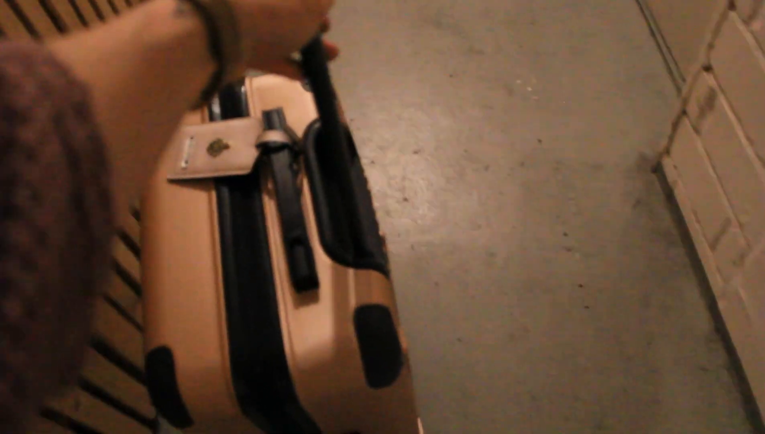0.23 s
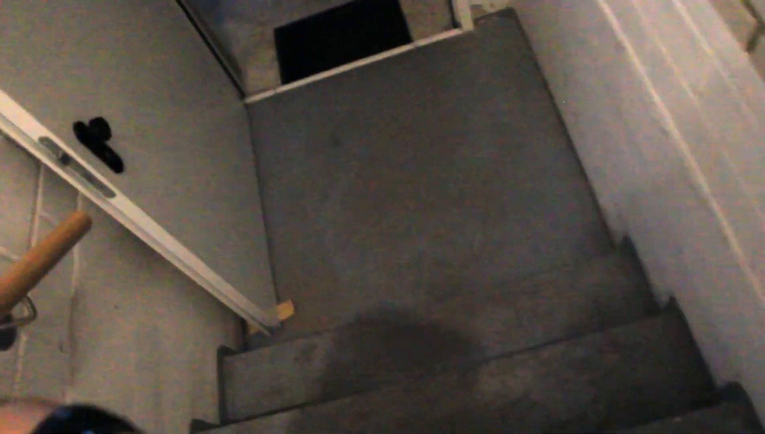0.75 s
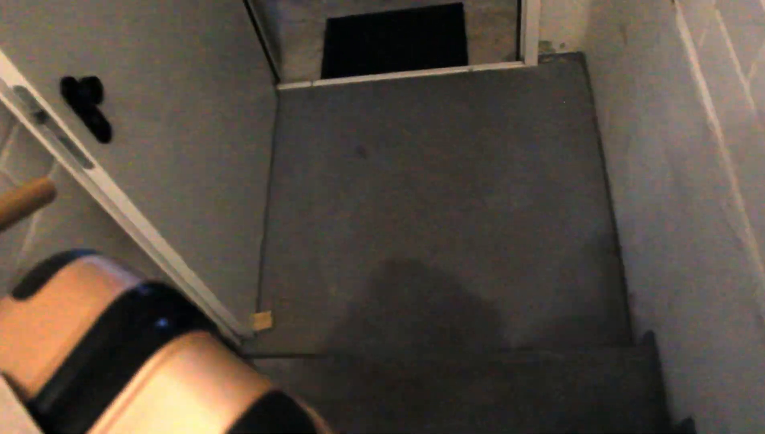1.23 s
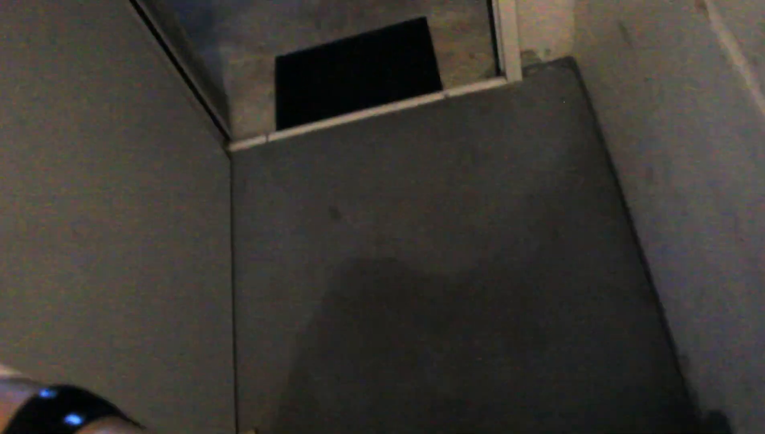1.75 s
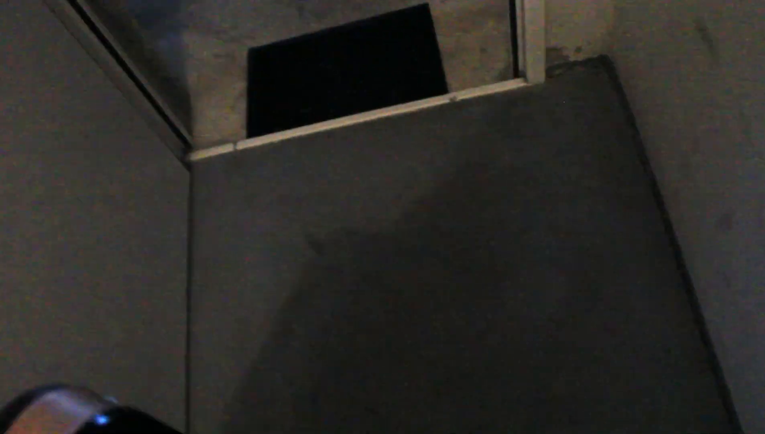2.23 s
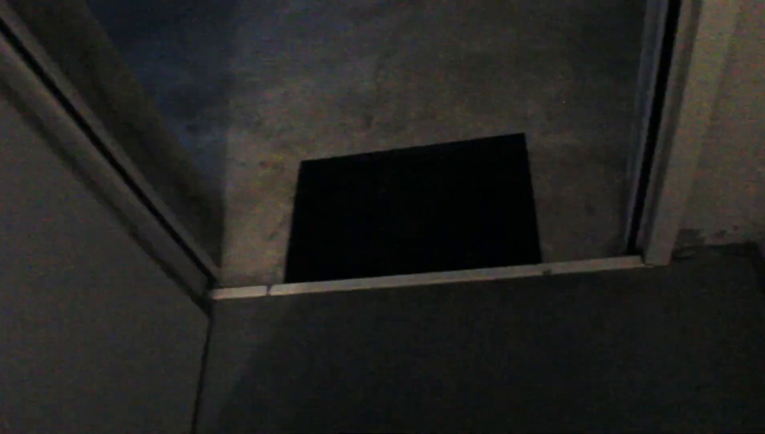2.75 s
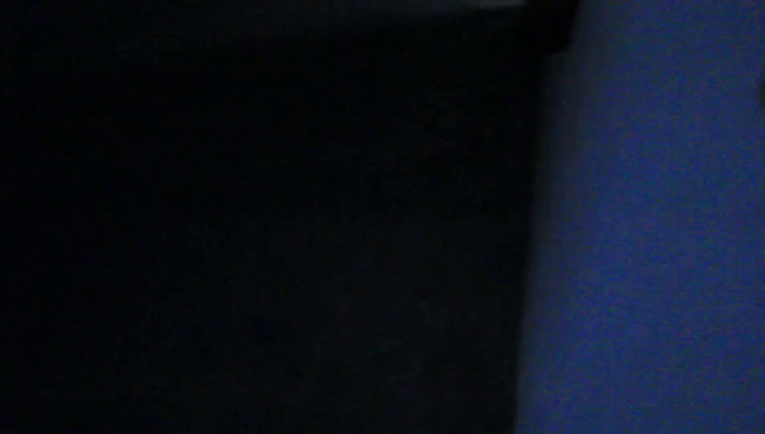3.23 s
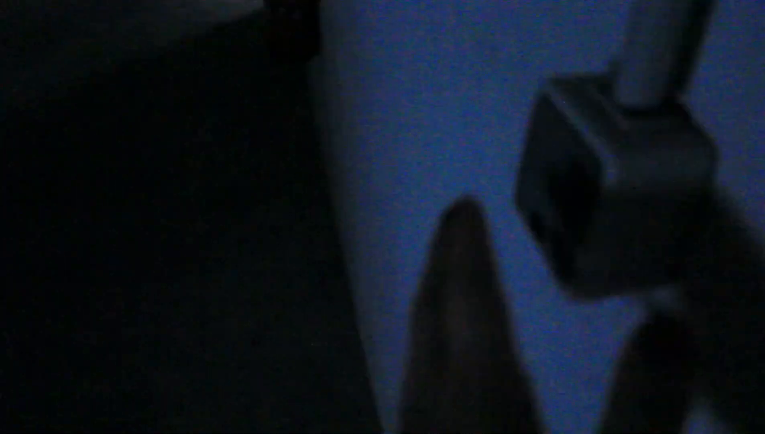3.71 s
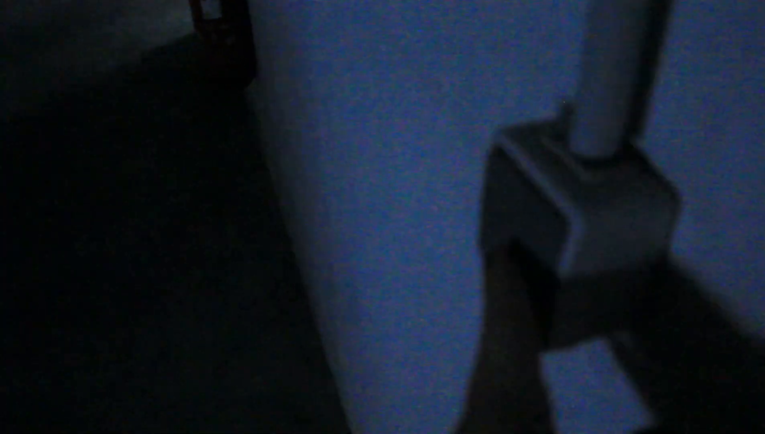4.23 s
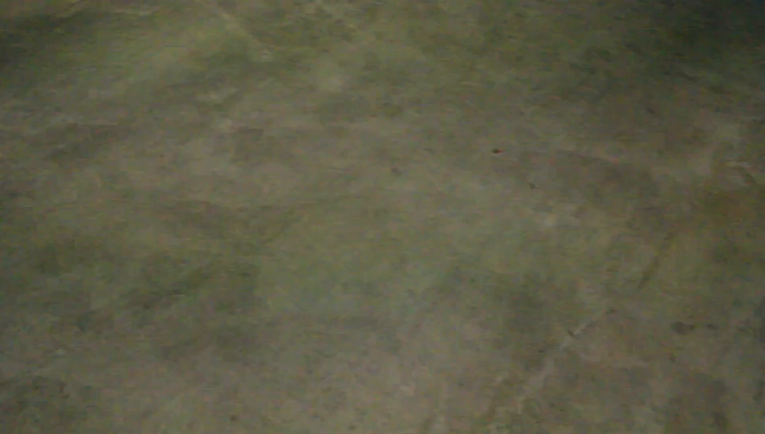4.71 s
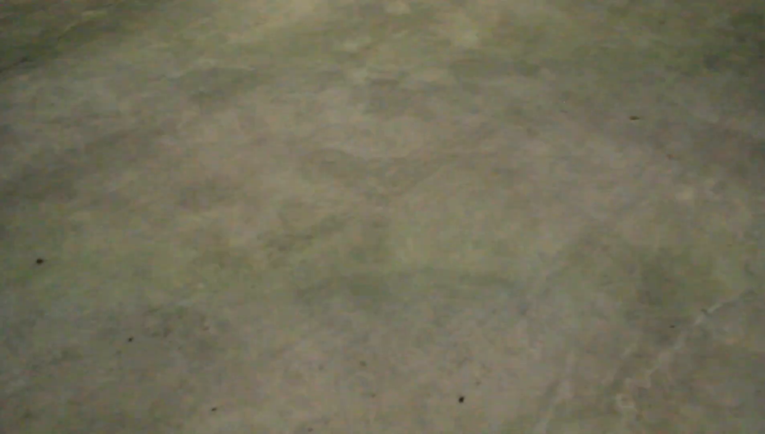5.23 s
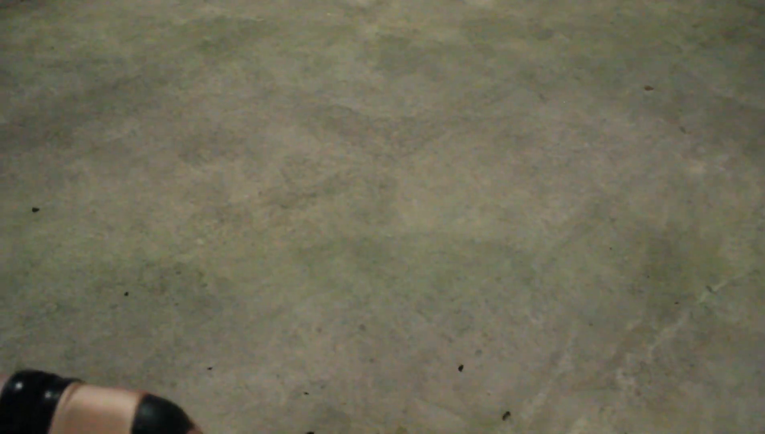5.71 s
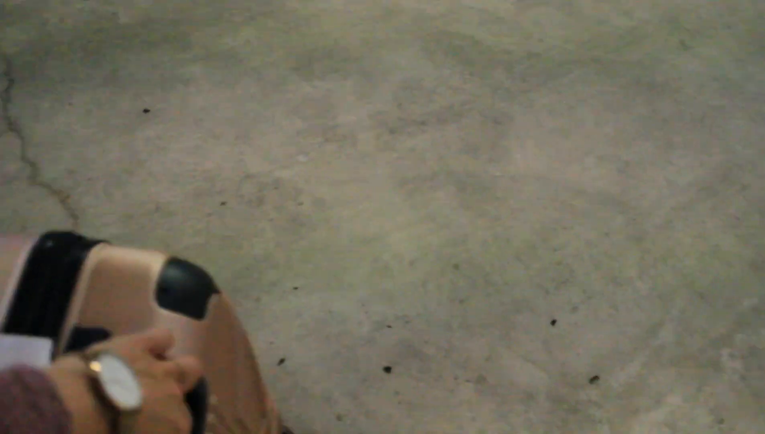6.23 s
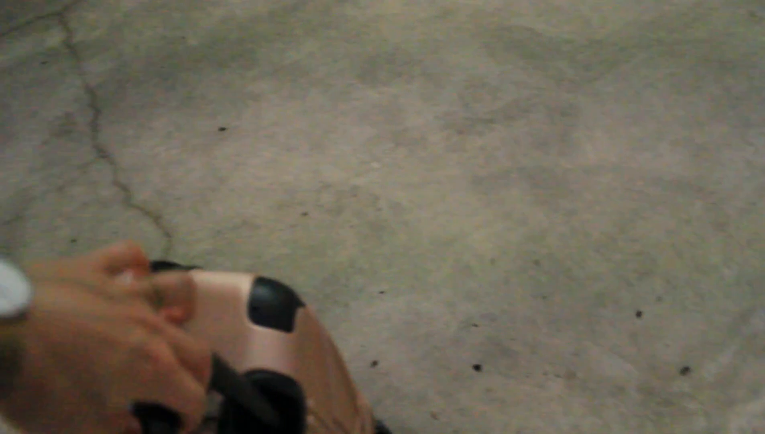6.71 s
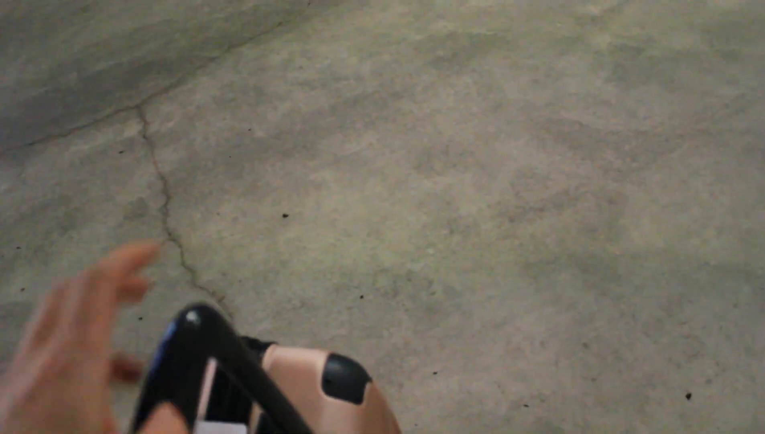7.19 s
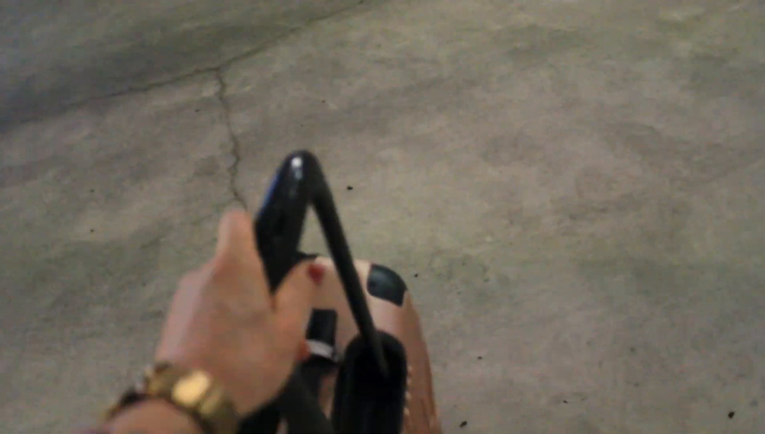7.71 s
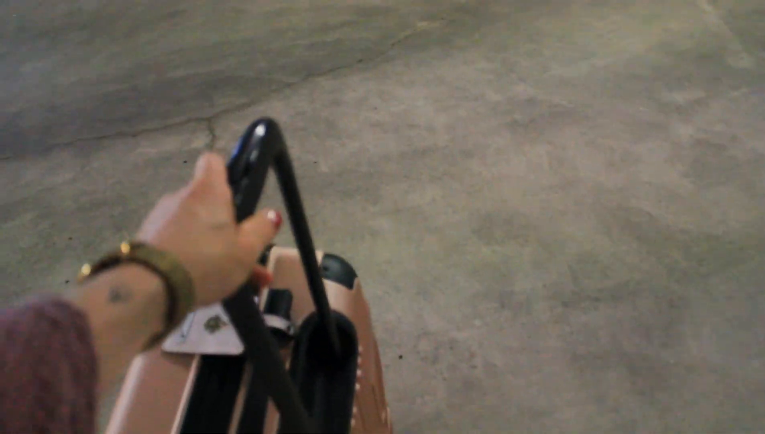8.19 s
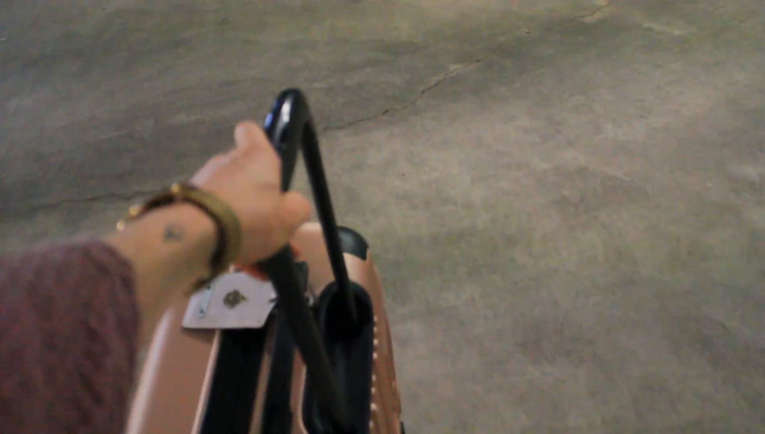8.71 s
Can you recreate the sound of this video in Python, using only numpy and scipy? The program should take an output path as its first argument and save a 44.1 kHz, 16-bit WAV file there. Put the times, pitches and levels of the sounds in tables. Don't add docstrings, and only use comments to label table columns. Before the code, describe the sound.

A hollow plastic suitcase is handled in bare concrete spaces, heard very close. A short gritty roll cuts to stair steps with boomy thuds and metallic shivers, then to a burst of heavy knocks. A plastic switch clacks twice in near quiet. Faint ticks and a shell knock lead to sharp handle latches, a scraping slide, small rattles and renewed soft rolling.

```python
import sys
import numpy as np
from scipy import signal
from scipy.fft import rfft, irfft, next_fast_len
from scipy.io import wavfile

SR = 44100
rng = np.random.default_rng(int(sys.argv[2]) if len(sys.argv) > 2 else 0)


def volts(x):
    e = np.asarray(x, float) / 20
    return 10 ** e


def file_out(sig):
    cols = np.atleast_2d(sig).T
    lim = np.clip(cols, -1, 1)
    pcm = np.round(lim * 32767).astype(np.int16)
    wavfile.write(sys.argv[1], SR, pcm)


N = 394686
STRIKE = 5.3


def unit(x):
    return x / np.sqrt(np.mean(x ** 2) + 1e-20)


def coloured(x, spectrum):
    size = next_fast_len(len(x))
    hz = np.maximum(np.arange(size // 2 + 1) * SR / size, 1)
    point_hz, point_db = np.array(spectrum).T
    gain = volts(np.interp(np.log(hz), np.log(point_hz), point_db))
    return unit(irfft(rfft(x, size) * gain, size)[:len(x)])


def wander(rate_hz):
    knots = rng.standard_normal(900)
    return np.interp(np.arange(N) / SR * rate_hz, np.arange(900), knots)


def grit(per_s, spread_db):
    sizes = volts(spread_db * np.minimum(rng.exponential(1, N), 4)) * rng.choice([-1, 1], N)
    return sizes * (rng.random(N) < per_s / SR) + 1e-18


def ring(x, hz, t60_s):
    r = volts(-60 / (t60_s * SR))
    w = 2 * np.pi * hz / SR
    return signal.lfilter([0, np.sin(w)], [1, -2 * r * np.cos(w), r * r], x)


def band(x, low_hz, high_hz):
    return signal.sosfilt(signal.butter(2, [low_hz, high_hz], "band", fs=SR, output="sos"), x)


def contact(t60_s, length_s):
    t = np.arange(int(length_s * SR)) / SR
    return rng.standard_normal((3, len(t))) * volts(-60 * t / max(t60_s, .002))


def add(out, s, sound, peak_db):
    at = round(s * SR)
    out[at:at + len(sound)] += (sound * volts(peak_db) / np.max(np.abs(sound)))[:N - at]


def gestures(rows, idle_db, rise_db_s, fall_db_s):
    joins_s = (.389, 3.11)
    t = np.arange(0, N, 32) / SR
    power = 0
    for s, db, hold_s in rows:
        rise_db = rise_db_s * np.maximum(s - t, 0)
        fall_db = fall_db_s * np.maximum(t - s - hold_s, 0)
        same_scene = np.searchsorted(joins_s, t) == np.searchsorted(joins_s, s)
        power = power + volts(2 * (db - rise_db - fall_db)) * same_scene
    return 10 * np.log10(np.interp(np.arange(N) / SR, t, power) + volts(2 * idle_db))


def rumble(busy_db):
    # start_s, level_db, hold_s
    rolls = [(0, -33.5, 0.32), (.72, -54, .01), (.85, -40.5, .01), (1.0, -46.5, 0.085), (1.78, -39, .01),
             (2.07, -37.5, 0.27), (2.74, -44, .01), (3.04, -38.5, .07), (3.27, -36, 0.027), (4.95, -52, .1),
             (5.22, -48, 0.22), (5.47, -44, .01), (5.68, -45, .01), (6.24, -42.5, .01),
             (6.53, -32.5, 0.012), (7.1, -40.5, 0.0091), (7.75, -46.5, 0.22), (8.28, -39, 0.27),
             (8.6, -35.5, 0.46)]
    # mode_hz, width_hz, level_db
    shell_modes = [(171.3, 19, 18.5), (244.4, 29, 15), (300, 23, -14), (530, 360, -30.5)]
    # freq_hz, density_db
    rumble_spectrum = [(41, -55), (70, -45), (123, -27), (161, 1), (302, 8.5), (1500, -13), (1950, -70.5),
                       (3300, -120)]
    level_db = gestures(rolls, busy_db - 2.5, rise_db_s=153, fall_db_s=78)
    drive = unit(grit(700, 2.0)) + .5 * rng.standard_normal(N)
    shell = sum(volts(db) * unit(ring(drive, hz, 3.9 / width_hz)) for hz, width_hz, db in shell_modes)
    return volts(level_db + 2.0 * wander(22)) * unit(unit(shell) * 0.28 + coloured(drive, rumble_spectrum))


def thuds():
    # start_s, peak_db, ring_hz, t60_s
    thud_rows = [(0.688, -20, 265, 0.22), (1.299, -21.5, 281, 0.26), (1.734, -24, 185, 0.24),
                 (1.738, -22, 447, 0.12), (2.151, -13, 288, 0.25), (2.69, -12.5, 261, 0.19),
                 (2.692, -20, 540, 0.095), (3.011, -31, 354, 0.1), (3.282, -22, 230, 0.34),
                 (3.814, -32, 338, 0.14), (4.731, -24, 568, 0.22), (5.412, -25, 612, 0.19),
                 (5.623, -31, 540, 0.13), (5.702, -21, 537, 0.15), (6.018, -31, 220, 0.065),
                 (6.127, -22, 206, 0.2), (6.187, -20.5, 205, 0.087), (6.424, -25, 292, 0.15),
                 (6.481, -19, 285, 0.23), (6.547, -34, 307, 0.24), (6.767, -14.5, 537, 0.061),
                 (6.928, -16, 300, 0.13), (6.93, -26.5, 237, 0.72), (7.116, -21, 463, 0.16),
                 (8.245, -29.5, 170, 0.19), (8.61, -32, 340, .1), (8.659, -23, 225, 0.14),
                 (8.73, -25.5, 193, 0.24), (8.778, -29, 170, .15), (8.86, -22, 205, 0.17),
                 (8.896, -23, 300, 0.082), (8.924, -21.5, 165, 0.16), (0.183, -19, 477, 0.045),
                 (.234, -17, 480, 0.046), (0.248, -18, 520, .05)]
    out = np.zeros(N)
    for s, peak_db, hz, t60_s in thud_rows:
        push, scuff, _ = contact(1.3 * t60_s, 0.29)
        first = np.zeros(len(push))
        first[0] = 26
        low = ring(push, hz, 0.33 * t60_s) + ring(first, hz, 0.62 * t60_s)
        low = low + 0.31 * ring(push + first, 0.738 * hz, .5 * t60_s)
        add(out, s, band(low, 123, 930) + 44 * band(scuff, 220, 1030), peak_db - 3.0)
    return out


def pulls(drive, spread_db, t60_s):
    # mode_hz, level_db
    pull_modes = [(1950, -2), (2780, 3), (4200, -6), (5120, -10), (5480, 6.5), (6450, 5), (7400, 4.5),
                  (9000, -17), (9400, 1), (10200, -1.5), (11500, 4.5), (13100, 4.5), (14300, -8),
                  (15300, -4)]
    chance = rng.standard_normal((len(pull_modes), 3, 2))
    return sum(volts(db + spread_db * k) * ring(drive, hz * (1 + 0.016 * off), t60_s)
               for (hz, db), cluster in zip(pull_modes, chance) for off, k in cluster)


def clinks():
    # start_s, peak_db, shiver_t60_s, brightest_hz
    clink_rows = [
        (0.9879, -20, 0.39, 9000),
        (1.755, -38, 0.88, 6000),
        (2.206, -12, 0.36, 5800),
        (2.4952, -11.5, 0.4, 11500),
        (2.7528, -12, 0.39, 13000),
    ]
    out = np.zeros(N)
    t = np.arange(SR // 2) / SR
    for s, peak_db, t60_s, hz in clink_rows:
        decay = volts(-60 * t / 0.026) + 0.66 * volts(-60 * t / t60_s)
        touch = rng.standard_normal(len(t)) * decay
        sound = 0.007 * pulls(touch, 4.0, 0.03) + band(touch, 2400, 12800)
        favoured = volts(-5) * band(touch, hz / 1.44, hz * 1.22)
        add(out, s, sound + favoured, peak_db)
    return out


def knock(out, s, peak_db, hz, body_db, snap_db, t60_s, catch_s):
    t = np.arange(int(.08 * SR)) / SR
    crack = 1 + np.exp(-np.abs(t - catch_s) / 0.0016)
    onset = np.minimum((t + 1e-4) / (catch_s + 1e-4), 1) ** 2
    face, body, snap = contact(t60_s, .08) * crack * onset
    if not catch_s:
        face[0] = body[0] = STRIKE
    s = max(s - catch_s / 2, 0)
    add(out, s, .5 * band(face, 1480, 3670) + band(face, hz / 1.456, hz * 1.305), peak_db)
    add(out, s, band(body, 284, 730), peak_db + body_db)
    add(out, s, band(snap, 4840, 12200), peak_db + snap_db)


def bumps():
    # start_s, peak_db, centre_hz, body_rel_db, contact_t60_ms
    bump_rows = [(0.1349, -21.5, 1470, -7, 160), (.21, -24, 1460, 3, 50), (0.224, -17, 1410, -1, 22),
                 (.3592, -20, 2950, -26, 18), (1.098, -18.5, 3330, -22, 79), (3.2241, -27, 1000, 12, 85),
                 (3.245, -4.5, 1440, -10, 11), (3.2516, -11, 1400, -6, 12), (3.2638, -0.5, 1540, -9, 18),
                 (3.2688, -18, 1700, -4, 52), (3.2836, -3, 1970, -9.5, 12), (3.2881, -9, 2500, 1, 18),
                 (3.295, -21, 3000, -3, 27), (3.499, -27.5, 2000, 2, 9.3), (4.717, -42.5, 990, 21, 22),
                 (4.739, -18.5, 1610, 3.5, 8.2), (4.8327, -33, 1320, 13.5, 9.5),
                 (4.9766, -33.5, 1670, 2.5, 43), (5.4194, -10.5, 1830, -2, 16.5),
                 (5.5978, -25.5, 2930, -28, 43), (5.708, -25, 1060, 6.5, 14),
                 (6.1277, -31.5, 2210, 7.5, 33), (7.346, -14.5, 4740, -34, 35),
                 (8.3698, -15, 5030, -24, 16)]
    out = np.zeros(N)
    for s, peak_db, hz, body_db, t60_ms in bump_rows:
        knock(out, s, peak_db, hz, body_db, -19, t60_ms / 1000, catch_s=0)
    return out


def latches():
    # start_s, peak_db, centre_hz, body_rel_db, snap_rel_db
    latch_rows = [(.0044, -23, 2620, -17, -7), (0.2871, -20.5, 2600, -5, -3), (2.249, -17.5, 970, -1, -4),
                  (3.2541, -11, 4500, -16, -11), (5.628, -30, 1420, 10, -14), (6.1807, -8, 3000, -20, 3),
                  (6.183, -6, 3900, -36, -6), (6.9203, -12, 2500, -30, -12), (6.942, -15, 4060, -3, -1),
                  (6.9489, -10.5, 3500, -18, 3), (6.2611, -23.5, 3000, -22, -8),
                  (6.4264, -21, 2310, -26, -11), (6.556, -22, 2060, -2, 6.5),
                  (6.7703, -24.5, 4970, -15, 15.5), (6.9265, -2.5, 4400, -12, -6),
                  (7.1225, -12.5, 1630, -39, -10), (7.337, -15.5, 3460, -21, 3.5),
                  (8.0233, -15, 2200, -19, -10.5), (8.657, -23.5, 2510, -24, -2.5)]
    out = np.zeros(N)
    for s, peak_db, hz, body_db, snap_db in latch_rows:
        knock(out, s, peak_db, hz, body_db, snap_db, t60_s=0.032, catch_s=.003)
    return out


def switch():
    # start_s, peak_db, box_rel_db, snap_rel_db, box_hz
    snap_rows = [
        (4.017, -17.5, -18, -17, 658),
        (4.03, -15, -19, 3, 640),
        (4.0504, -21, -6, -12, 660),
        (4.055, 2, -20, -28, 620),
        (4.0655, -14.5, -26, -24, 640),
        (4.091, -44, 6, -12, 636),
        (4.2354, -29.5, 4, -3, 655),
        (4.246, -7.5, -19, -2, 670),
        (4.2507, -5, -3.5, -3, 682),
        (4.263, -15, -18, -8, 666),
    ]
    # mode_hz, level_db, t60_s
    rocker_modes = [(2070, -23, 0.033), (2560, -5.5, 0.042), (3000, -15, 0.034), (4060, -13, 0.027),
                    (635, -34, 0.44)]
    out = np.zeros(N)
    for s, peak_db, box_db, snap_db, box_hz in snap_rows:
        face, body, snap = contact(0.0071, 0.3)
        face[0] = STRIKE
        rocker = sum(volts(db) * ring(face, hz, t60_s) for hz, db, t60_s in rocker_modes)
        box = sum(ring(np.abs(body), hz, 0.029) for hz in (box_hz, box_hz * 1.03))
        add(out, s, band(face, 1570, 4700) + 0.024 * rocker, peak_db)
        add(out, s, band(box, 600, 1020), peak_db + box_db)
        add(out, s, band(snap, 4400, 22000), peak_db + snap_db)
    return out


def metal(busy_db):
    # start_s, level_db, hold_s
    slides = [(.27, -49, .01), (.37, -46, .02), (.675, -37.5, 0.011), (.85, -46, .01), (1.05, -43.5, 0.012),
              (1.8, -47, 0.116), (2.0, -41, 0.041), (2.3, -40.5, .01), (2.55, -47, 0.011),
              (2.85, -39, 0.0066), (3.0, -48.5, 0.1), (6.57, -32.5, 0.22), (6.91, -35.5, 0.012),
              (7.3, -64, 0.01), (7.75, -55.5, .15), (8.23, -52, 0.014), (8.65, -56, 0.12)]
    # freq_hz, density_db
    slide_spectrum = [(2060, -23.5), (3500, -5), (13100, -9), (15800, -13.5), (16400, -52)]
    stairs_s = (.39, 3.11)
    level_db = gestures(slides, busy_db - 14.5, rise_db_s=144, fall_db_s=139)
    hiss = coloured(rng.standard_normal(N) + 0.66 * unit(grit(2500, 5.1)), slide_spectrum)
    a, b = (int(s * SR) for s in stairs_s)
    hiss[a:b] += .5 * unit(pulls(grit(240, 1.7)[a:b], 2.4, 0.11))
    return volts(level_db + 0.62 * wander(25)) * hiss


def rustle(busy_db):
    # start_s, level_db, hold_s
    rubs = [(0, -36, 0.011), (.27, -32.5, 0.0059), (.37, -35, .02), (.69, -36, .03), (.85, -38.5, 0.017),
            (1.0, -42, 0.14), (1.45, -43.5, 0.006), (1.68, -46, 0.042), (1.9, -38, 0.0045),
            (2.07, -36, 0.017), (2.3, -32, 0.057), (2.67, -44, 0.028), (3.05, -39, 0.046),
            (3.56, -45.5, .01), (4.8, -51.5, .01), (5.49, -49, 0.1), (5.93, -49.5, 0.11),
            (6.56, -40.5, 0.054), (6.78, -35.5, 0.064), (7.0, -39.5, 0.15), (8.3, -58, 0.29)]
    # freq_hz, density_db
    rustle_spectrum = [(410, -4), (700, -1), (1700, -2.5), (2200, 1), (2800, -3.5), (5000, -10),
                       (10400, -27), (17600, -120)]
    level_db = gestures(rubs, busy_db, rise_db_s=132, fall_db_s=122)
    grains = unit(grit(900 * volts(4.0 * wander(9.9)), 7.4))
    return volts(level_db + wander(40)) * coloured(.5 * grains + rng.standard_normal(N), rustle_spectrum)


def scuffs():
    # start_s, length_s, peak_db, centre_hz, bright_rel_db
    scuff_rows = [
        (3.077, 0.011, -24, 2360, -18),
        (3.503, 0.026, -15, 2500, -15),
        (4.746, 0.0092, -20.5, 1510, -19.5),
        (5.854, 0.048, -27, 2340, -10.5),
        (6.786, 0.047, -19, 3700, -5),
        (6.925, 0.021, -5, 3080, 1),
        (7.51, 0.022, -21.5, 2500, -28),
    ]
    out = np.zeros(N)
    for s, length_s, peak_db, hz, bright_db in scuff_rows:
        place = np.linspace(0, 1, int(1.93 * length_s * SR))
        swell = np.interp(place, [0, .12, .6, 1], [0.59, 0.61, 0.16, 0.032])
        grains = swell * rng.standard_normal(len(swell)) * volts(0.78 * rng.standard_normal(len(swell)))
        sound = 1.3 * band(grains, hz / 2.0, hz * 1.53) + band(grains, hz / 1.35, hz / 1.06)
        add(out, s, sound + volts(bright_db) * band(grains, 7700, 13000), peak_db)
    return out


def ticks():
    # start_s, peak_db
    handle_ticks = [(.1807, -25), (1.408, -28), (1.5624, -29), (2.6397, -24), (3.8212, -39), (6.463, -25.5),
                    (7.0387, -23), (7.0758, -27), (7.311, -30), (7.6201, -28.5), (7.8094, -30.5),
                    (7.8755, -35), (7.9863, -30), (8.067, -31), (8.1035, -38), (8.1235, -29), (8.1862, -31),
                    (8.24, -30), (8.2744, -23.5), (8.2964, -30), (8.3985, -28), (8.61, -30), (8.8146, -30),
                    (7.507, -45), (6.156, -40), (7.46, -30), (7.97, -37), (8.458, -38), (8.483, -35),
                    (8.52, -33.5)]
    # start_s, peak_db
    tag_ticks = [(.844, -23), (.9223, -25), (1.548, -29), (1.5916, -26.5), (1.6397, -26.5), (1.847, -24),
                 (2.0877, -22), (2.1053, -24), (2.2852, -18), (2.3155, -29), (2.3794, -22), (3.3253, -31),
                 (3.9758, -31), (5.517, -34), (5.584, -35), (6.5343, -24), (7.2904, -27), (7.3274, -20),
                 (7.3882, -24.5), (7.5896, -27.5), (7.6368, -26.5), (7.7154, -22), (7.7957, -35),
                 (7.8321, -31), (7.998, -40), (8.6877, -27), (8.863, -29), (8.9315, -28.5), (6.754, -21),
                 (6.815, -24), (8.574, -34), (8.783, -36), (7.77, -37)]
    # start_s, peak_db
    buckle_ticks = [(2.405, -22.5), (4.8584, -31), (4.906, -32), (5.079, -39), (5.176, -39), (5.23, -41),
                    (5.2763, -30), (5.3604, -37), (5.5348, -33), (5.656, -29), (6.8007, -21), (6.8296, -17),
                    (7.1671, -22.5), (7.423, -27), (8.353, -35), (8.557, -29), (8.6422, -23.5),
                    (6.808, -17), (7.073, -28), (7.142, -28), (8.392, -33), (5.303, -41.5)]
    # start_s, peak_db
    ring_ticks = [(3.6064, -44), (5.9928, -35), (6.0062, -36), (6.0464, -40), (6.0856, -39), (6.9714, -21),
                  (6.9844, -26), (6.9924, -26), (7.1028, -30), (7.1844, -43), (7.279, -34), (7.3664, -33),
                  (7.4061, -42), (7.4944, -46), (8.4482, -39), (8.7251, -38), (8.7714, -39), (8.827, -37),
                  (8.8744, -38), (8.8897, -45)]
    out = np.zeros(N)
    for rows, part_hz in ((handle_ticks, 2210), (tag_ticks, 2950), (buckle_ticks, 4330), (ring_ticks, 5740)):
        for s, peak_db in rows:
            hz = part_hz * np.exp(0.15 * rng.standard_normal())
            face = contact(0.026, .03)[0]
            wide = band(face, hz / 1.84, min(hz * 2.0, 16000))
            add(out, s, band(face, hz / 1.09, hz * 1.16) + 0.5 * wide, peak_db)
    return out


def squeaks():
    # start_s, length_s, from_hz, to_hz, peak_db
    squeak_rows = [(.345, 0.043, 2700, 3000, -25), (0.98, 0.1, 4200, 4200, -34),
                   (1.74, 0.38, 2770, 2780, -37), (1.75, 0.35, 4210, 4200, -35.5),
                   (1.81, 0.37, 1950, 1950, -38), (3.3, .2, 3200, 3100, -40), (3.51, .13, 3250, 3200, -36),
                   (3.52, .13, 2200, 2250, -38), (5.49, 0.12, 2600, 2700, -42),
                   (5.58, 0.17, 2700, 2550, -42), (5.86, .045, 1900, 2050, -33),
                   (6.3, 0.16, 1800, 2250, -40), (6.97, .33, 2700, 2450, -41), (6.97, .2, 2130, 2100, -40)]
    out = np.zeros(N)
    for s, length_s, from_hz, to_hz, peak_db in squeak_rows:
        hz = np.linspace(from_hz, to_hz, int(length_s * SR))
        roughness = 0.25 + unit(band(rng.standard_normal(len(hz)), 15, 130))
        flutter = np.sqrt(np.hanning(len(hz))) * roughness
        add(out, s, flutter * np.sin(2 * np.pi * np.cumsum(hz) / SR), peak_db)
    return out


def walls(x):
    # centre_hz, t60_s, level_db
    wall_bands = [(300, 0.54, -14), (2500, 0.53, -11.5), (9000, 0.071, -13)]
    t = np.arange(SR) / SR
    edges_hz = [40, 1700, 3500, 17000]
    tail = 0
    for (_, t60_s, db), low_hz, high_hz in zip(wall_bands, edges_hz, edges_hz[1:]):
        noise = unit(band(rng.standard_normal(SR), low_hz, high_hz) * volts(-60 * t / t60_s))
        tail = tail + volts(db) * noise * np.sqrt((high_hz - low_hz) / 17000)
    tail = tail * np.clip(t / 0.007, 0, 1) / np.sqrt(SR)
    return signal.fftconvolve(x, tail)[:N]


def sway():
    # time_s, level_db
    sway_levels = [
        (0, -58),
        (.45, -74),
        (1.9, -75),
        (2.3, -46),
        (2.6, -61),
        (4.55, -59.5),
        (4.75, -55),
        (6.9, -72),
        (7.5, -53),
        (8.95, -54),
    ]
    level_db = np.interp(np.arange(N) / SR, *np.transpose(sway_levels))
    return volts(level_db) * unit(band(band(rng.standard_normal(N), 29, 114), 32, 122))


def still_air():
    # freq_hz, density_db
    air_spectrum = [(59, -48.5), (100, -21), (163, -23), (331, -21), (437, -16), (13300, -37.5),
                    (15500, -38), (16500, -57)]
    return volts(-54.5) * coloured(rng.standard_normal(N), air_spectrum)


def scene():
    # time_s, level_db
    busy = [(0, -43), (.386, -45), (.392, -50), (.63, -55), (1.17, -48), (1.27, -51), (1.7, -49.5),
            (2.45, -52.5), (3.105, -46), (3.115, -50), (3.65, -46), (3.95, -59), (4.68, -59), (5.3, -58.5),
            (6.4, -48), (7.25, -44), (7.85, -50), (8.95, -51.5)]
    busy_db = np.interp(np.arange(N) / SR, *np.transpose(busy))
    moving = rumble(busy_db) + rustle(busy_db) + metal(busy_db)
    hits = bumps() + latches() + ticks() + scuffs() + thuds() + clinks()
    snaps = switch()
    echo = walls(hits + volts(-3.5) * snaps)
    return (hits + snaps + echo + moving + still_air() + sway() + squeaks())[None]


def roll_off(x):
    return signal.sosfilt(signal.butter(12, 16990, fs=SR, output="sos"), x)


def record(dry):
    rounded = 1.6 * np.tanh(band(dry, 43.2, 22000) / 1.627)
    top = signal.cheby2(10, 60, 17100, fs=SR, output="sos")
    return roll_off(signal.sosfilt(top, rounded))


dry = scene()
out = record(dry)
file_out(out)
```